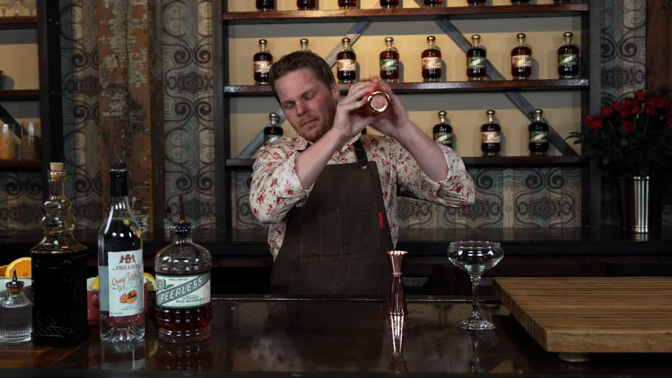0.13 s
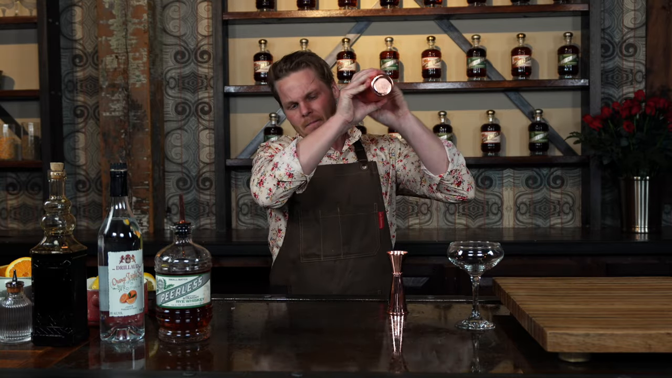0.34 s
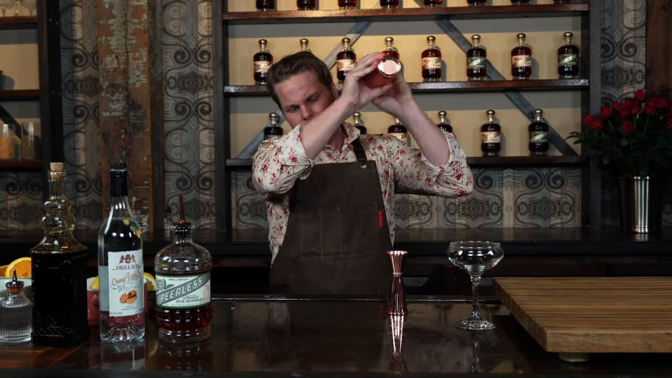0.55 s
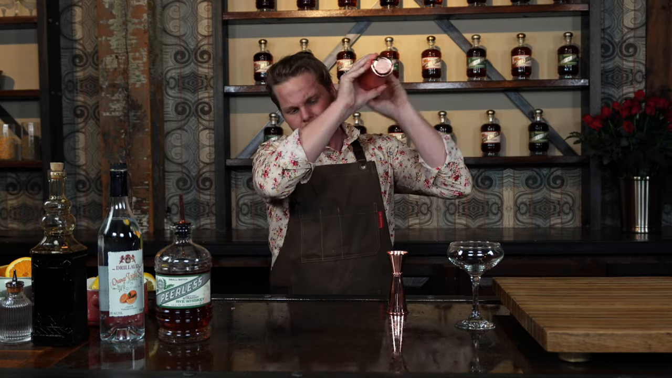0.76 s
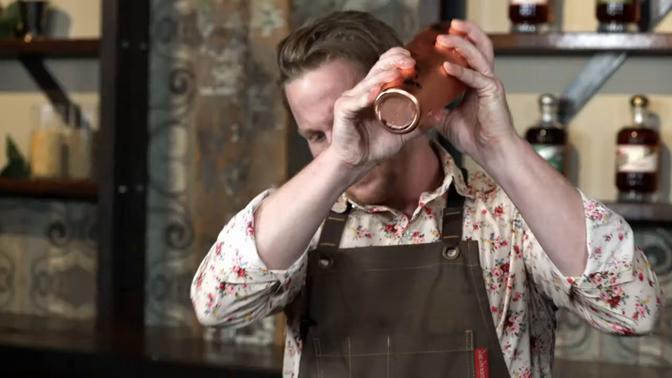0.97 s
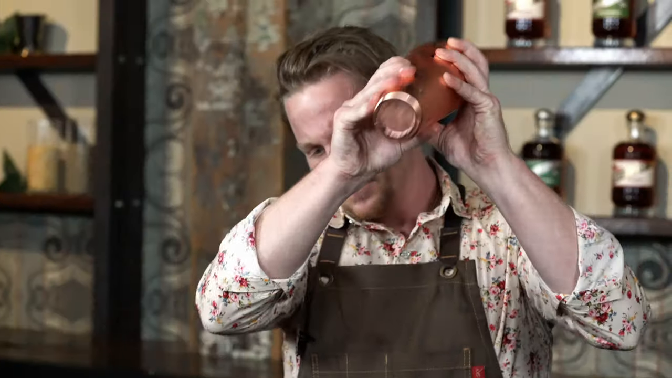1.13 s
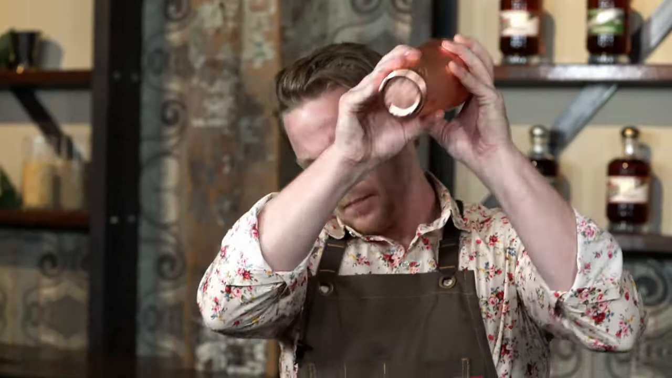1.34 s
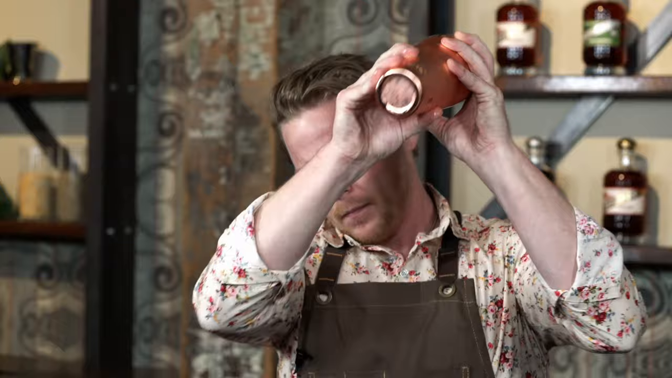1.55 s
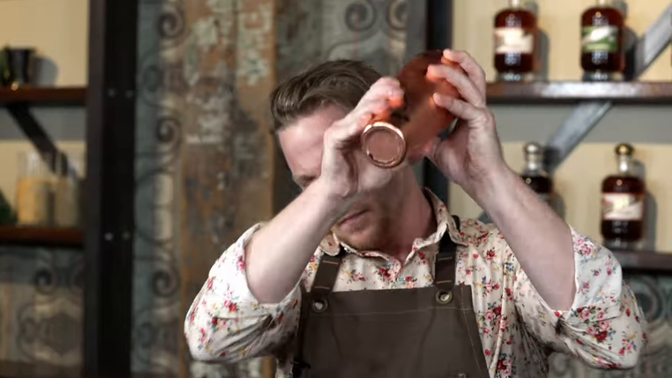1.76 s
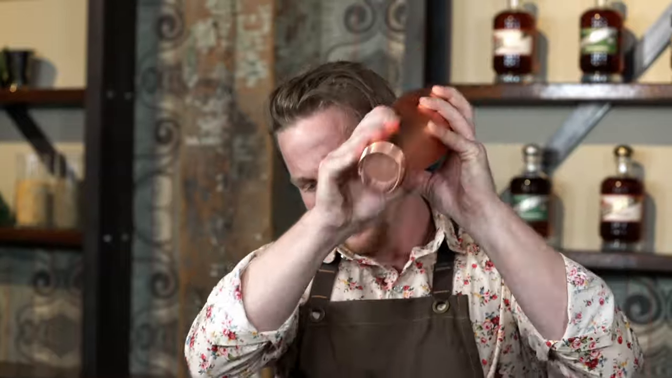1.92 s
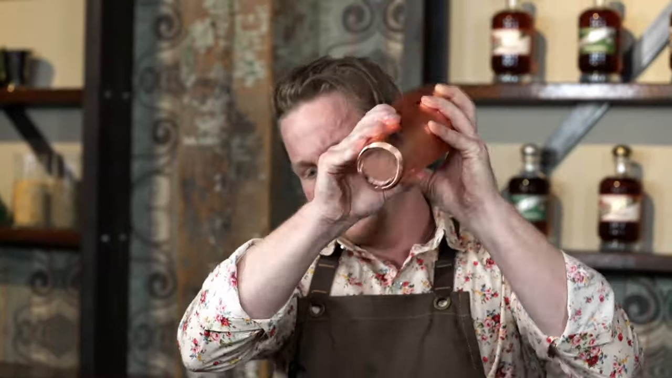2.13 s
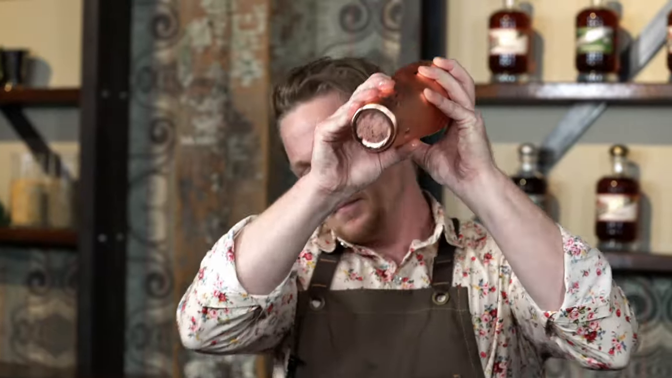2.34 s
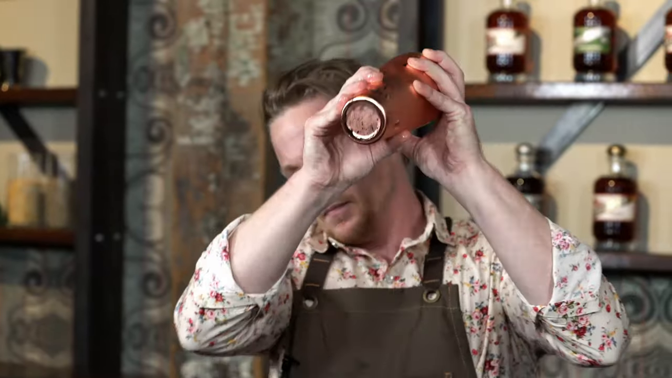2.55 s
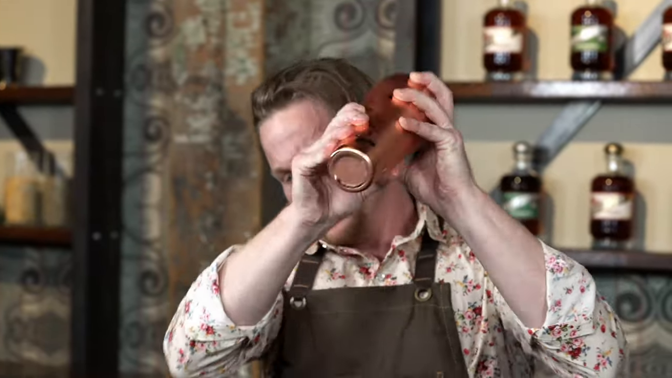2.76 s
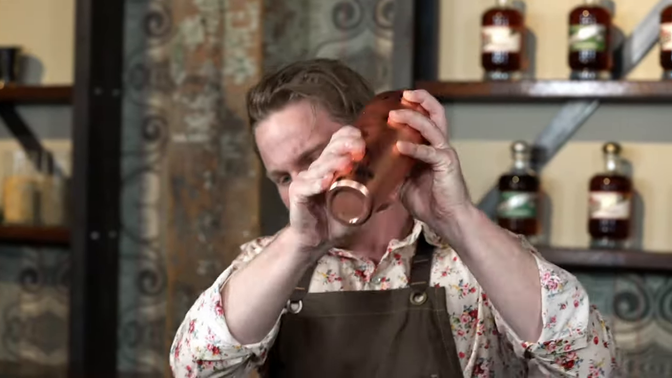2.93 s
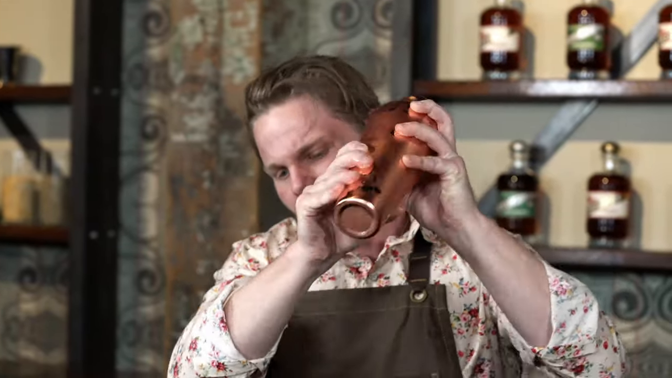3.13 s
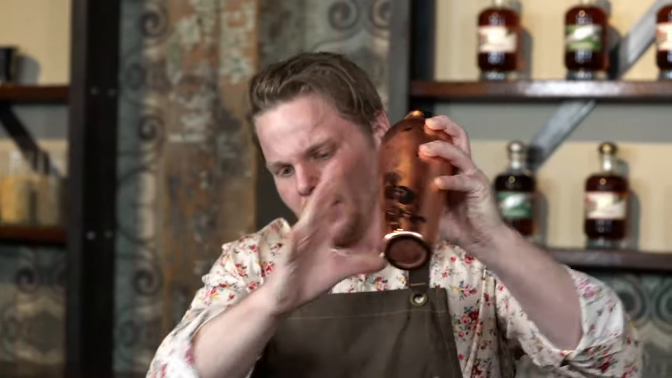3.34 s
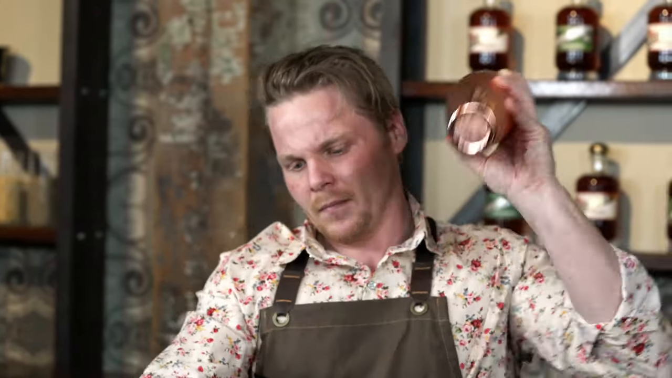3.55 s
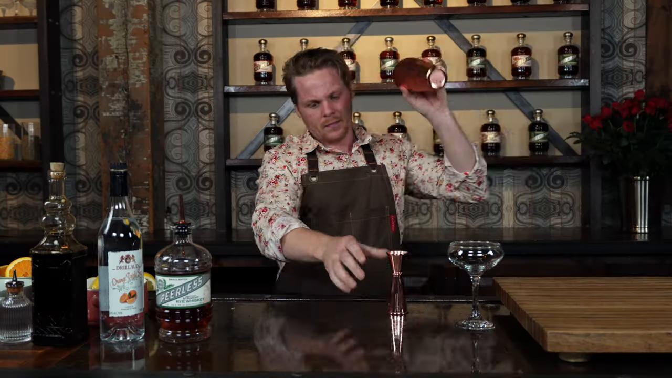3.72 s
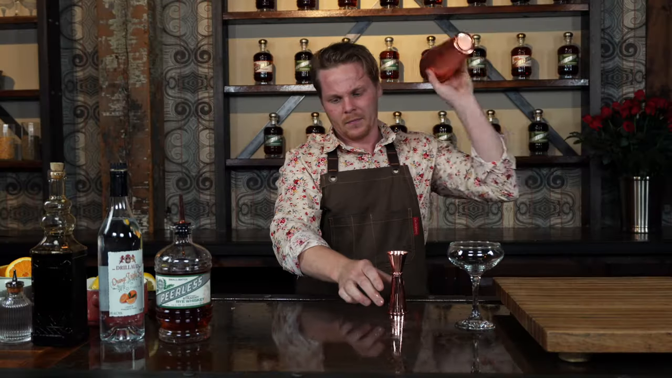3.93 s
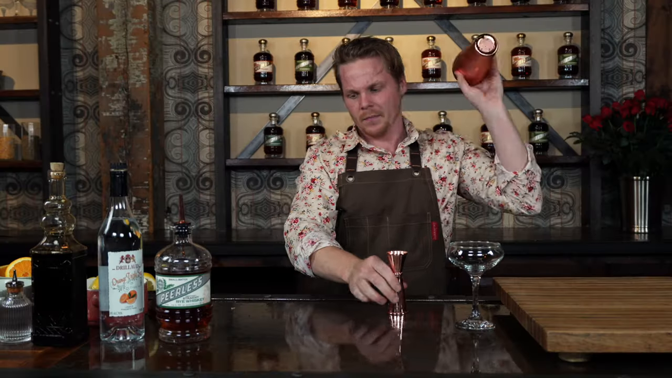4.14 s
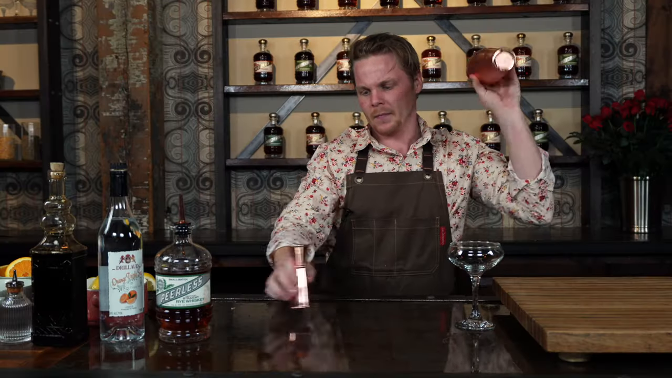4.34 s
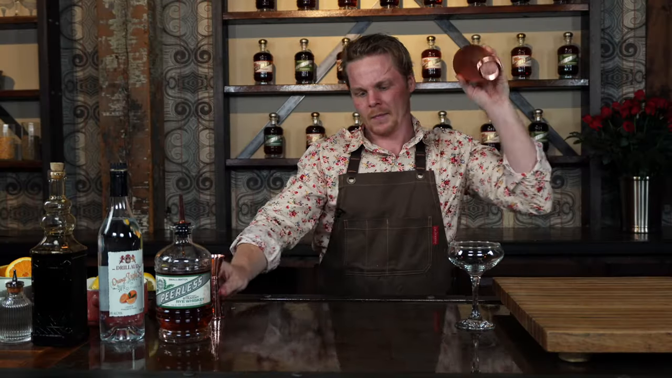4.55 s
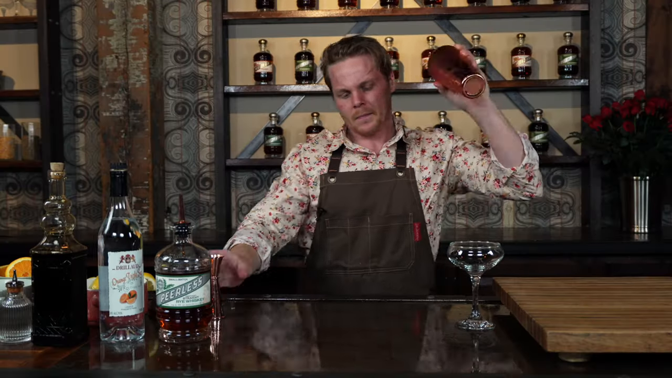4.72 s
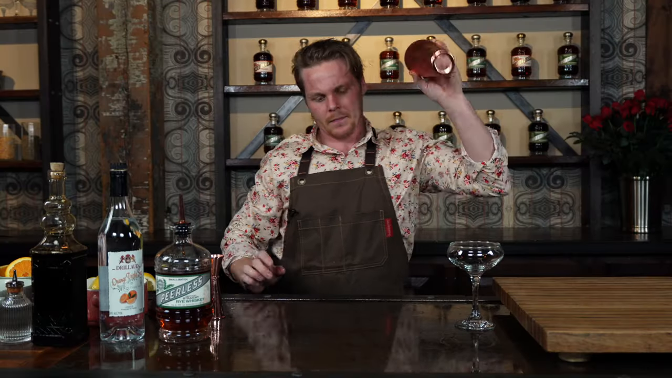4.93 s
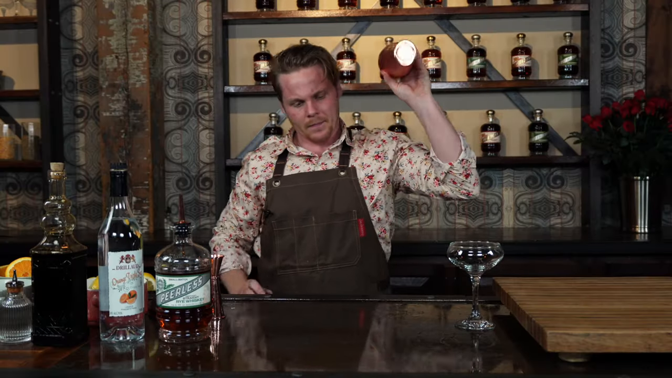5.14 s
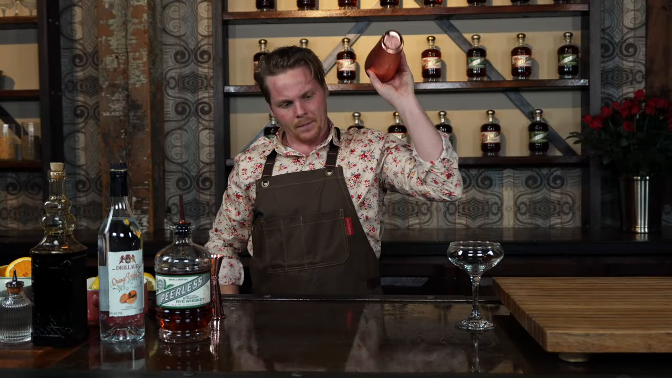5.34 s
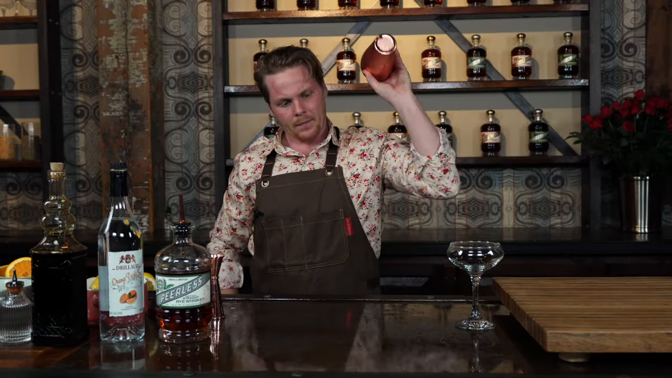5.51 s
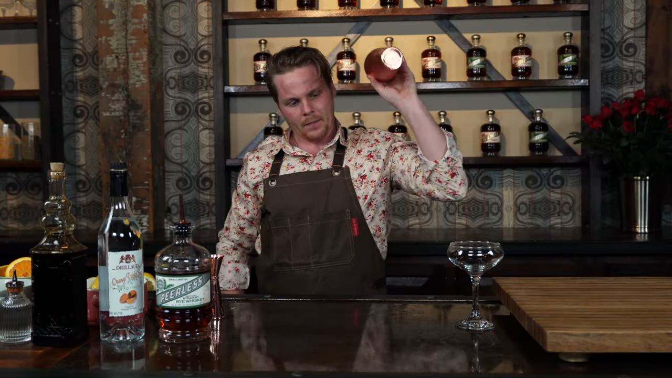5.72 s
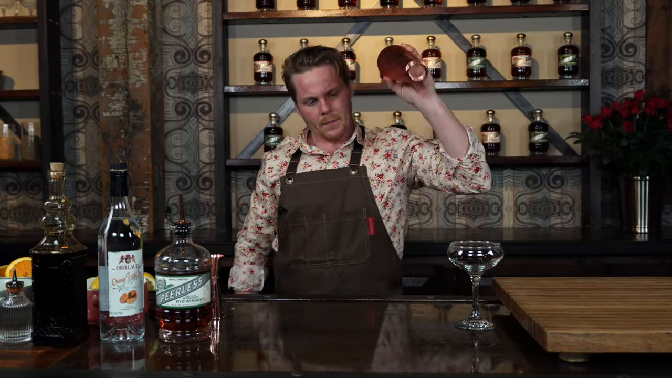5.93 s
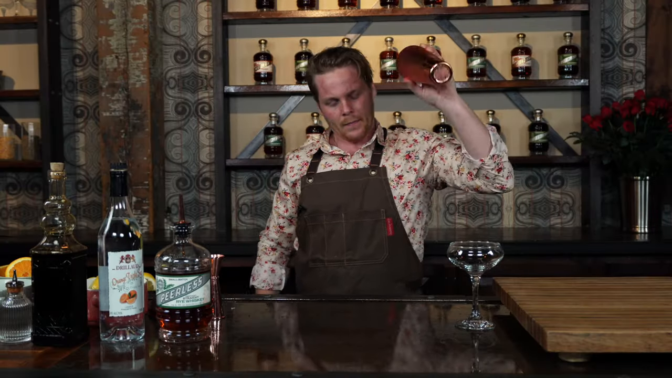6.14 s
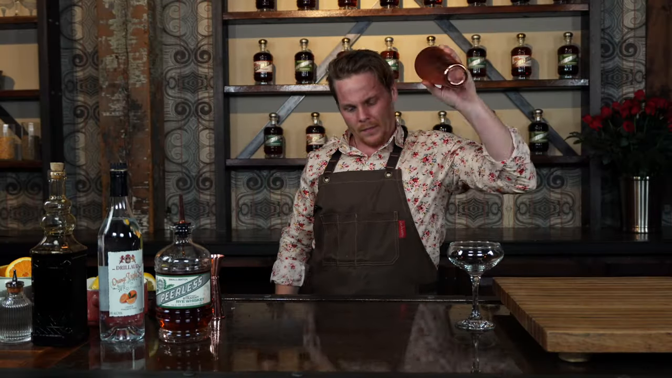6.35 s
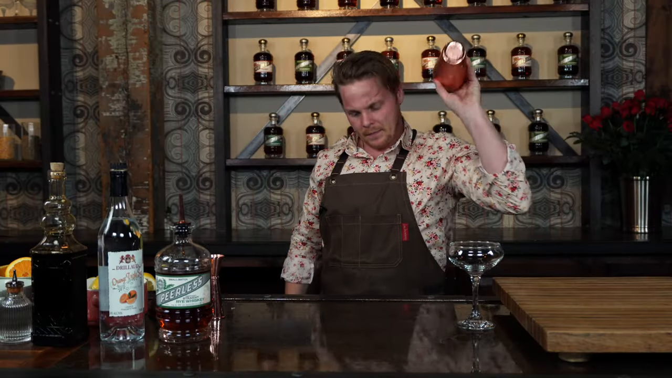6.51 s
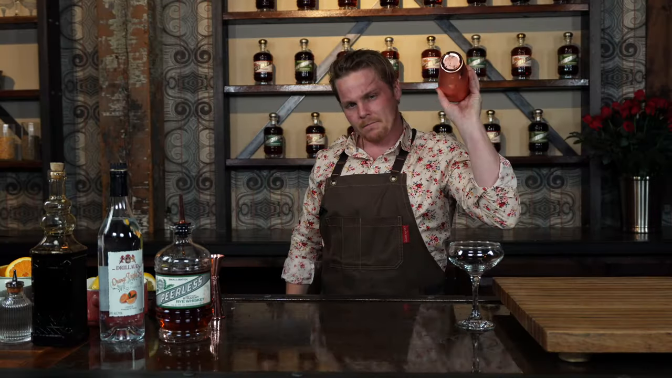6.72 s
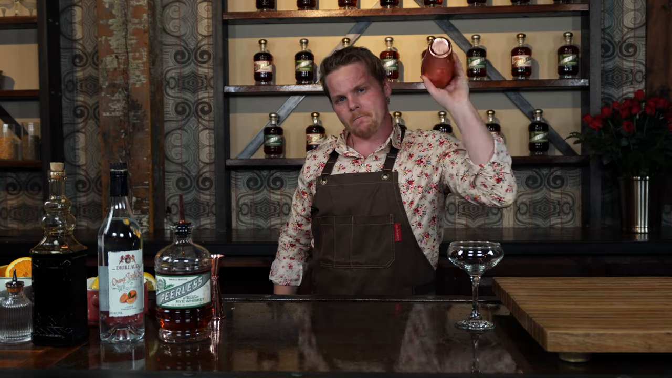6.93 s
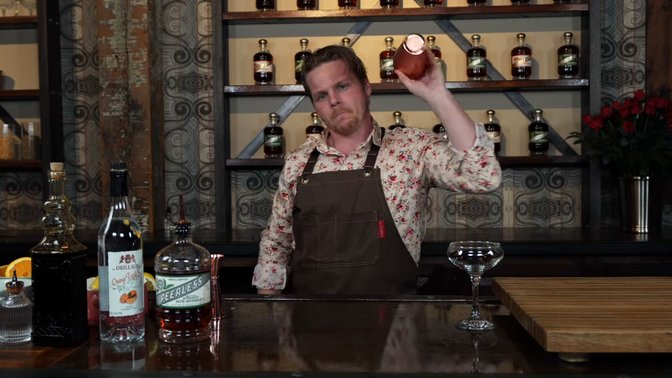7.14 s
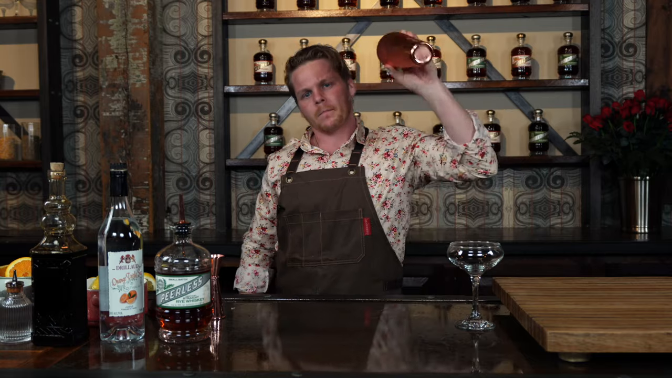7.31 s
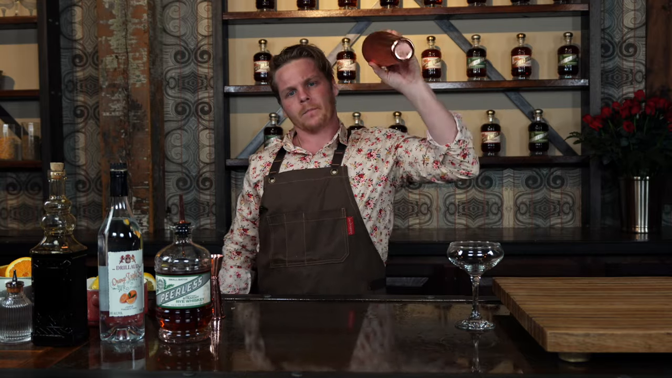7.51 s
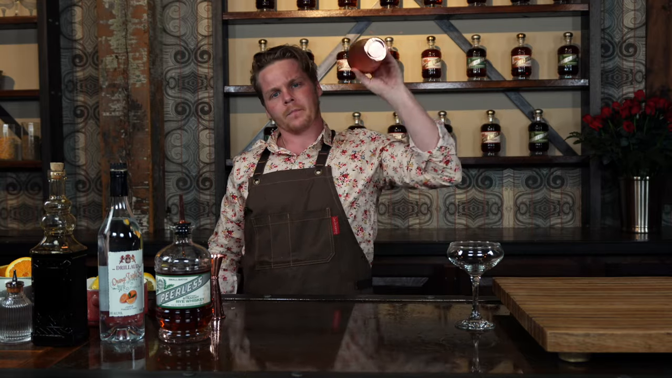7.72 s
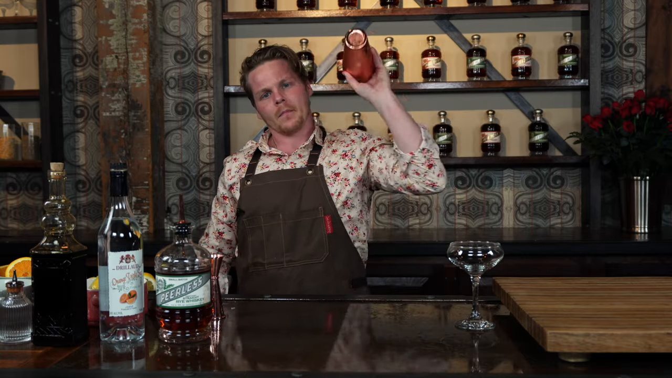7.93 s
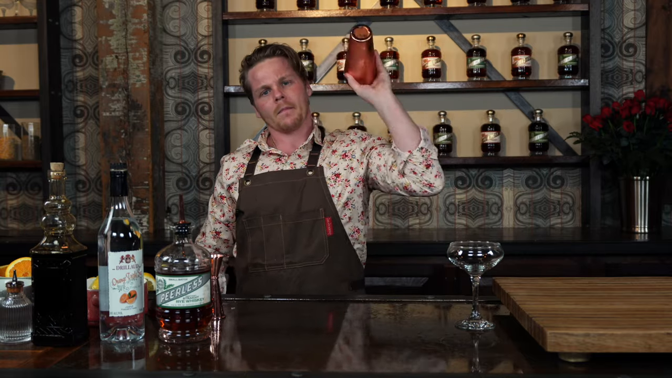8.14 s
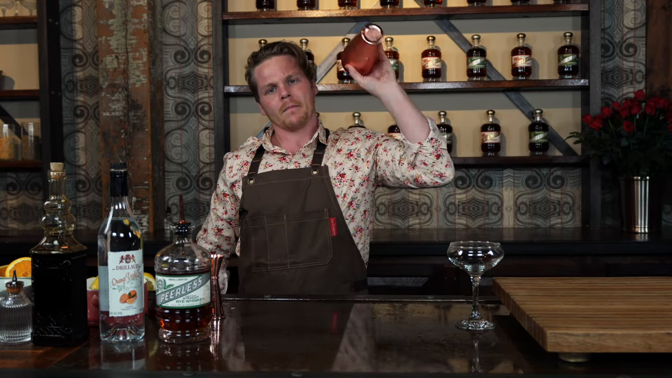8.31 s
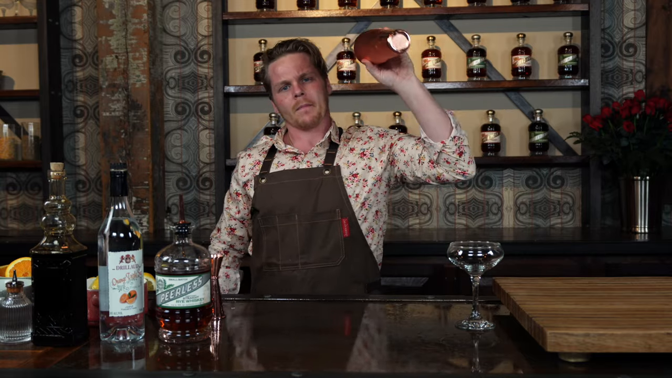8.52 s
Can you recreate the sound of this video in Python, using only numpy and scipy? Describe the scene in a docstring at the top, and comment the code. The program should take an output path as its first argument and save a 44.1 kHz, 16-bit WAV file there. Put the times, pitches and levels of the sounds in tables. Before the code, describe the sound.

Close up in a quiet bar, a metal cocktail shaker is shaken hard with both hands, the ice crashing from end to end with sharp clicks and some slosh. The rattle briefly dulls as the grip changes, then continues more lightly in one hand. Around the middle, a small metal jigger is put down on the wooden counter with a short knock. Faint room air lies underneath.

```python
"""At a bar, ice rattles in a metal shaker, first in two hands, then in one, about nine landings a second.
Each landing, at base and cap in turn, is a cloud of small knocks and slosh with a few hard cube hits
that ring the shell. The free hand drags a jigger aside and sets it down on the wooden counter.
Underneath lie steady room air and a low rumble that swells with the arm; a short room tail follows."""
import sys
import numpy as np
from scipy import signal
from scipy.io import wavfile
from scipy.ndimage import uniform_filter1d

SR = 44100
rng = np.random.default_rng(int(sys.argv[2]) if len(sys.argv) > 2 else 0)


def write(x):
    x = np.atleast_2d(x).T
    wavfile.write(sys.argv[1], SR, np.round(np.clip(x, -1, 1) * 32767).astype(np.int16))


N = 382347

# tone of the bar's air: (frequency [Hz], relative level [dB])
AIR_EQ = [(15, -62), (25, -42), (458, -11), (616, -25), (3850, 11), (6240, -26), (15600, -2)]
# fader ride of the arm rumble: (time [s], level [dB])
RUMBLE_RIDE = [(0, -68), (.25, -62), (.6, -76), (1.1, -70.5), (3.1, -69), (3.3, -55), (3.55, -73),
               (5.7, -78), (8.67, -77.5)]
# ice landing at base and cap in turn: (time [s], attack [s], crest level [dB])
LANDINGS = [(.04,.052,-19.5),(.127,.061,-20),(.239,.045,-21.5),(0.348,.057,-23.5),(.456,.042,-21),(.572,.044,-23.5),
            (.652,.055,-24),(.772,0.027,-23.5),(.862,0.042,-22.5),(0.966,.04,-25),(1.074,.049,-19),(1.161,.059,-25),
            (1.274,.044,-21),(1.371,.053,-23.5),(1.485,0.041,-20.5),(1.567,.076,-23.5),(1.677,.055,-22.5),(1.787,.021,-22.5),
            (1.88,.049,-20),(1.978,.027,-23),(2.077,.024,-18.5),(2.171,.061,-23),(2.274,.044,-22),(2.38,.039,-22.5),
            (2.457,.055,-21.5),(2.574,.026,-21),(2.676,.056,-22),(2.777,0.026,-22.5),(2.868,.027,-23),(2.972,.047,-20),
            (3.052,.056,-22),(3.16,.02,-18.5),(3.25,.11,-23),(3.479,0.027,-26),(3.622,.037,-26),(3.706,.1,-32),
            (3.859,.032,-27.5),(3.972,.025,-25.5),(4.106,.037,-26),(4.2,.063,-28),(4.325,.046,-27),(4.424,.062,-27.5),
            (4.576,0.013,-27.5),(4.693,.031,-26.5),(4.801,0.042,-28),(4.921,.042,-24.5),(5.028,.061,-29.5),(5.15,.024,-27.5),
            (5.276,.02,-28),(5.363,.062,-28),(5.507,.027,-26.5),(5.591,.045,-27.5),(5.721,.025,-26),(5.833,.041,-25.5),
            (5.96,.054,-27.5),(6.069,.031,-24.5),(6.199,.034,-27),(6.31,0.025,-24.5),(6.436,.013,-23.5),(6.546,.045,-25.5),
            (6.658,.047,-29),(6.787,.027,-25),(6.911,.026,-29),(7.024,.042,-27.5),(7.144,0.026,-30),(7.254,.037,-26),
            (7.382,.02,-30),(7.489,.038,-28.5),(7.608,.028,-29.5),(7.705,.063,-29.5),(7.803,.07,-30.5),(7.961,.036,-26),
            (8.078,.033,-31),(8.182,.046,-27.5),(8.287,.066,-31),(8.422,.019,-26.5),(8.549,.033,-27.5),(8.637,.017,-31)]
# rattle floor between landings: (time [s], level [dB])
LULLS = [(0, -30), (.5, -40), (.95, -33), (1.9, -33), (2.4, -35.5), (2.78, -38), (2.9, -32), (3.2, -30),
         (3.48, -34), (3.62, -41), (3.72, -37), (4.5, -38.5), (5.5, -36), (6.5, -39), (7.8, -38.5),
         (7.96, -32.5), (8.08, -40), (8.67, -38.5)]
# two hands, then one: (lull lift at base and cut at cap [dB], base dullness [dB], cap dullness [dB])
GRIPS = [(1.5, -1, 1.8), (-2.5, -3, 2)]
# tone of the small knocks and slosh: (frequency [Hz], relative level [dB])
RATTLE_EQ = [(24, -57), (40, -56), (213, -28), (485, -14), (655, -6.5), (800, -6.5), (1570, -3.5),
             (2460, -1), (3000, -4.5), (5070, -5), (5890, -8.5), (7020, -8), (9240, -15), (12800, -15),
             (15600, -19.5)]
# accents, the hardest single cubes: (time [s], ring level [dB], pitch [Hz], tick against ring [dB])
HARD_HITS = [(.0464,-6.5,1670,-28),(.0729,-4,2860,-20),(.1739,-8,2180,-1),(.1933,-12,3530,-14),(.248,-6,1990,1),
             (.2528,-11,1660,5.5),(.2573,-19,1460,6),(.268,-9,2050,-18),(.2703,-11,1480,-19),(.3129,-12,5070,-4),(.3605,-9.5,5000,2),(.4881,-6,1730,-18),
             (.5895,-11.5,2240,-2),(.6057,-18,1030,-18),(.7081,-11,1710,-16),(.7145,-9.5,3700,-18),(.7923,-14,2080,5),(.8097,-10.5,4400,-21),(.8905,-10,1400,-21),
             (.9803,-11,2430,1.5),(1.0018,-10,2350,-3),(1.0871,-6.5,1740,-14),(1.12,-7.5,2100,-13),(1.166,-8,5200,-4),
             (1.2944,-7,2330,-23),(1.3777,-13.5,5160,2),(1.3836,-11,2470,2.5),(1.4935,-5.5,1470,-19),(1.507,-10,2050,-13),
             (1.513,-12,6800,-13),(1.5257,-16,1380,-14),(1.5804,-9.5,2330,-13),(1.5886,-17,2200,0),(1.7448,-11,2110,-16),(1.8982,-8,1610,-22),(1.91,-9.5,1700,-22),(1.9182,-10,2450,-13),(1.9234,-13,1870,-11),
             (1.9754,-5,2370,0),(2.0982,-8,1370,-10),(2.1385,-7.5,1830,-22),(2.293,-5.5,1510,-10),(2.3829,-16.5,4520,1),(2.3996,-12,2200,3.5),
             (2.5019,-8,1530,-17),(2.512,-7.5,2350,-16),(2.6864,-11,2030,7),(2.7825,-11.5,2460,1),(2.9278,-7,2540,-8),
             (2.9448,-9,2240,-13),(3.0024,-13,5000,5),(3.0799,-3,1670,-24),(3.0994,-11,3760,-30),(3.1048,-4.5,2430,-18),(3.1727,-1,2340,-10),
             (3.1863,-3.5,2330,-16),(3.2018,-12,1940,-10),(3.2407,-13,2380,-30),(3.2557,-6,2300,-14),(3.2636,-0.5,1830,-5.5),(3.2937,-8.5,2120,-11),
             (3.311,-12,2440,-20),(3.3522,-13.5,5570,8.5),(3.3737,-13,2440,-11),(3.3903,-7,2270,-24),(3.532,-9,6000,-8),
             (3.7102,-17.5,1450,-2),(3.7232,-10.5,2040,-3),(3.7602,-11.5,7170,-10),(4.1136,-14.5,2040,-7),(4.2532,-13.5,4800,-1),
             (4.2685,-16.5,4960,1),(4.3873,-20,4000,-17),(4.4365,-17,4800,-17),(4.4585,-17,3550,-4),(4.5898,-24,2780,-21),(4.6238,-12.5,4900,-11),(4.7053,-14,5700,-1),(4.8537,-20.5,3330,8),(4.9296,-15.5,6460,2.5),(4.9334,-15.5,4150,-8),(4.9728,-12,2220,1),
             (5.047,-12,3450,-18),(5.099,-21,4520,-12),(5.1616,-14,1440,7),(5.3715,-11.5,6440,-5),(5.386,-20.5,1550,8),(5.4214,-15,1980,-3),
             (5.5227,-15.5,3780,-7),(5.6147,-11,6670,-11),(5.8375,-19,4230,-2),(5.8628,-17,1700,-10),(5.9876,-15,2670,-6),(6.073,-12.5,3700,-7),
             (6.0852,-13.5,1550,3.5),(6.2286,-15.5,2700,-16),(6.3155,-23,6000,7),(6.3237,-20,2930,3),(6.3468,-17,2980,-2),(6.6641,-9.5,2580,-3.5),(6.6943,-13,2740,-17),
             (6.7944,-15,1550,1),(6.81,-25,4560,6),(6.8176,-18,2430,-9),(6.831,-15,2300,-4),(6.9541,-16,3250,-2),(7.0487,-13.5,1620,1.5),(7.1508,-17.5,2550,-3),
             (7.188,-12.5,2760,-15),(7.264,-27,3750,10),(7.2827,-24,1460,15.5),(7.2892,-24,2430,9),(7.3006,-15,2640,-14),(7.409,-12.5,3290,-22),(7.4967,-20,7000,9),
             (7.5982,-23,3570,8),(7.6312,-13,2750,-18),(7.636,-13,2660,-19),(7.7435,-19,2980,-8),(7.8137,-15,2580,-13),(7.8313,-20,2660,-17),(7.987,-20,1870,6),(8.016,-16,2520,-20),
             (8.0835,-16,2780,-7),(8.0926,-13.5,2780,-20),(8.1077,-9.5,2840,-13),(8.2275,-15,3140,0),(8.2938,-12,2520,-22),
             (8.321,-13.5,2540,-21),(8.4508,-17,4470,6.5),(8.578,-14.5,2680,-17)]
# centre pitch of the softer hits, two hands, then one: (base [Hz], cap [Hz])
SOFT_HIT_PITCHES = [(1700, 2400), (2650, 1900)]
# modes of the metal shell: (frequency [Hz], relative level [dB], decay to -60 dB [s])
SHELL_MODES = [(1620, -29, 0.066), (2330, -25, 0.045), (2545, 13, 0.069), (2550, 9, 0.07),
               (2700, -17, .035), (3770, 10, 0.04), (5000, -8, 0.07), (7000, 19, 0.014)]
# reverb time of the bar: (frequency [Hz], decay to -60 dB [s])
ROOM_DECAY = [(300, 0.38), (1500, 0.25), (5000, 0.072), (14000, 0.14)]
# jigger touching the counter: (time [s], level before the low cut [dB], thud boost [dB])
JIGGER_TOUCHES = [(4.2465, -18, -22), (4.288, -27, -18), (4.472, -10.5, 5.5), (4.478, -22, -7),
                  (4.489, -17.5, -5)]
# modes of the counter under the jigger: (frequency [Hz], relative level [dB], decay to -60 dB [s])
COUNTER_MODES = [(258, 11, 0.058), (342, 8, 0.03), (420, -5, 0.13), (642, 4, 0.097), (745, 1, 0.077),
                 (771, 12.5, 0.088), (910, 16, 0.044), (1490, -15, .04)]

ONE_HAND_S = 3.42  # the second hand lets go
REGRIP_S, REGRIP_WIDTH_S, REGRIP_DULL_DB = 3.78, 0.37, 9  # the knocks darken while the grip changes


def gain_of(db):
    return 10 ** (np.asarray(db) / 20)


def unit_rms(x):
    return x / np.sqrt(np.mean(x ** 2) + 1e-20)


def unit_peak(x):
    return x / abs(x).max()


def curve_at(points, hz):
    """Read a curve along a log frequency axis."""
    frequency, value = np.transpose(points)
    return np.interp(np.log(hz + 1), np.log(frequency + 1), value)


def place(mix, start_s, sound):
    part = mix[max(round(start_s * SR), 0):][:len(sound)]
    part += sound[:len(part)]


def low_cut(x, hz):
    """Small bodies radiate little below hz."""
    return signal.sosfilt(signal.butter(3, hz, "high", fs=SR, output="sos"), x)


def equalise(x, points, size=4096):
    """Minimum-phase EQ through (frequency [Hz], gain [dB]) points."""
    log_gain = np.log(gain_of(curve_at(points, abs(np.fft.fftfreq(size, 1 / SR)))))
    spectrum = np.exp(np.conj(signal.hilbert(log_gain)))
    return signal.oaconvolve(x, np.fft.ifft(spectrum).real[:size // 2])[:N]


def ring(hz, t60, size=600):
    """A struck mode: a dying sine."""
    t = np.arange(size) / SR
    return gain_of(-60 * t / t60) * np.sin(2 * np.pi * hz * t)


def bar_air():
    """Room tone: a faint, steady bed of noise."""
    return gain_of(-67.5) * unit_rms(equalise(rng.standard_normal(N), AIR_EQ))


def arm_rumble():
    """Dark noise that swells with the arm movement."""
    band = signal.butter(2, [45, 190], "band", fs=SR, output="sos")
    dark = signal.sosfilt(band, rng.standard_normal(N))
    level_db = np.interp(np.arange(N) / SR, *np.transpose(RUMBLE_RIDE))
    return gain_of(level_db) * unit_rms(dark)


def shake_envelopes():
    """Level and dullness of the rattle: a jump as the ice lands, a crest, a fall into the next lull."""
    start, attack, crest_db = np.transpose(LANDINGS)
    at_base = np.arange(len(start)) % 2 == 0
    shift_db, base_db, cap_db = np.array(GRIPS)[(start > ONE_HAND_S).astype(int)].T
    lull_db = np.interp(start, *np.transpose(LULLS)) + np.where(at_base, shift_db, -shift_db)
    jump_db = np.maximum(crest_db - 4.5, lull_db)
    regrip = np.exp(-((start - REGRIP_S) / REGRIP_WIDTH_S) ** 2)
    dull_db = np.where(at_base, base_db, cap_db) + REGRIP_DULL_DB * regrip
    times = np.stack([start - .014, start, start + 0.013, start + attack], axis=1).ravel()
    levels = np.stack([lull_db, lull_db, jump_db, crest_db], axis=1).ravel()
    order = np.argsort(times)
    t = np.arange(N) / SR
    level_db = np.interp(t, np.r_[times[order], N / SR + .04], np.r_[levels[order], -38])
    return level_db, np.interp(t, start + attack, dull_db)


def punch(level_db):
    """How far the level stands above its quarter-second average, in dB."""
    return level_db - uniform_filter1d(level_db, SR // 4)


def knock_cloud(per_s, spread_db, lo_hz, hi_hz, cycles, pitches):
    """Random knocks, mostly small, each dying away over the given number of cycles."""
    strikes = gain_of(spread_db * np.minimum(rng.exponential(1, N), 2.8)) * rng.choice([-1, 1], N)
    strikes *= rng.random(N) < per_s / SR
    voice = rng.integers(0, pitches, N)
    knocks = (signal.oaconvolve(strikes * (voice == k), ring(hz, cycles / hz) * hz)[:N]
              for k, hz in enumerate(np.geomspace(lo_hz, hi_hz, pitches)))
    return unit_rms(sum(knocks))


def tumble(per_s):
    """Cubes tumble in bunches: a level flutter of sudden starts and quick fades, with unit spread."""
    starts = rng.exponential(1, N) * (rng.random(N) < per_s / SR)
    fading = signal.lfilter([1], [1, -np.exp(-1 / (0.0025 * SR))], starts)
    bunches = np.log(0.42 + fading)
    return unit_rms(bunches - bunches.mean())


def ice_rattle():
    """Dull knocks, bright ticks and the slosh of the drink, all riding the force of the stroke."""
    level_db, dull_db = shake_envelopes()
    punch_db = punch(level_db)
    dull = knock_cloud(per_s=900, spread_db=3.0, lo_hz=535, hi_hz=1953, cycles=13, pitches=16)
    bright = knock_cloud(per_s=1600, spread_db=3.5, lo_hz=2050, hi_hz=6450, cycles=10.5, pitches=10)
    crisp = knock_cloud(per_s=1200, spread_db=3.5, lo_hz=6300, hi_hz=14600, cycles=7.9, pitches=8)
    slosh = rng.standard_normal(N)
    mix = gain_of(-6.5 + 0.62 * dull_db) * dull + gain_of(0.5 - 0.4 * dull_db) * bright
    mix += gain_of(-1.5 + 0.15 * punch_db) * crisp  # harder landings are crisper
    mix += gain_of(-12.5 + 0.19 * punch_db) * slosh
    # flatten the overall spectrum, then dial in the rattle's tone
    hz, power = signal.welch(mix, SR, nperseg=256)
    flat = equalise(mix, np.transpose([hz[1:], -10 * np.log10(power[1:])]))
    body = equalise(flat, RATTLE_EQ)
    flutter = gain_of(1.85 * tumble(per_s=150))
    return low_cut(gain_of(level_db) * unit_rms(flutter * body), 163)


def soft_hits(count=80, spread_octaves=.16):
    """Chance fill between the accents, in rows like HARD_HITS; most fall near a landing's crest."""
    level_db, _ = shake_envelopes()
    odds = np.cumsum(gain_of(2 * punch(level_db)))
    when, strength, tick = rng.random((count, 3)).T
    sample = np.searchsorted(odds / odds[-1], (np.arange(count) + when) / count).clip(0, N - 1)
    start = sample / SR
    landing = np.maximum(np.searchsorted(np.transpose(LANDINGS)[0], start) - 1, 0)
    centre_hz = np.array(SOFT_HIT_PITCHES)[(start > ONE_HAND_S).astype(int), landing % 2]
    hz = centre_hz * 2 ** (spread_octaves * rng.standard_normal(count))
    ring_db = level_db[sample] + 7.5 + 5.5 * (strength - .5)
    tick_db = -11 + 13 * tick
    return np.transpose([start, ring_db, hz, tick_db])


def cube_hits():
    """Single cubes strike: two close rings, a weaker stray ring, and a bright crack with an overtone."""
    hits = np.r_[HARD_HITS, soft_hits()]
    out, draws = np.zeros(N), rng.random((len(hits), 4))
    t = np.arange(600) / SR
    cracks = low_cut(rng.standard_normal((len(hits), 600)), 3000) * gain_of(-60 * t / 0.0047)
    cracks = signal.lfilter([1], [1, -.35], cracks)  # ice dulls the very top
    snap = ring(4800, t60=0.0015)  # the dry first touch
    contact = 1 - np.exp(-t / 0.000067)  # ice gives a little, so the rings swell in
    for (start, db, hz, tick_db), (side, detune, low, high), crack in zip(hits, draws, cracks):
        t60 = .006 + 12 / hz  # low, hollow knocks last a little longer
        pair = ring(hz, t60) + .5 * ring(hz * (0.836 + 0.41 * detune), t60)
        stray = ring(1100 * 3.24 ** low, t60=0.0082)
        overtone = ring(3200 * 2.335 ** high, t60=0.011)
        body = unit_peak(contact * (pair + 0.58 * stray))
        tick = unit_peak(crack) + 0.34 * snap + 0.48 * overtone
        place(out, start, np.sign(side - .5) * gain_of(db) * (body + gain_of(tick_db) * tick))
    return low_cut(out, 760)


def shell_ring(knocks):
    """The hand-damped metal rings on after each knock."""
    modes = sum(gain_of(db) * ring(hz, t60, size=4000) for hz, db, t60 in SHELL_MODES)
    return low_cut(signal.oaconvolve(knocks, modes / np.linalg.norm(modes))[:N], 1700)


def room_tail(direct):
    """Noise tails, each band dying at its own speed; the moving shaker feeds three of them in turn."""
    out, predelay = np.zeros(N), np.zeros(round(.002 * SR))
    turn = 2 * np.pi * 1.3 * np.arange(N) / SR
    for k in range(3):
        hz, t, bands = signal.stft(rng.standard_normal(SR // 2), SR, nperseg=256)
        decay = gain_of(-60 * t / curve_at(ROOM_DECAY, hz)[:, None])
        _, tail = signal.istft(bands * decay, SR, nperseg=256)
        send = np.sqrt(2 / 3) * np.cos(turn + k * np.pi / 3)
        out += signal.fftconvolve(direct * send, np.r_[predelay, tail / np.linalg.norm(tail)])[:N]
    return out


def jigger():
    """A small metal foot knocks on the wooden counter; the modes under 500 Hz carry the thud."""
    out = np.zeros(N)
    for start, db, thud_db in JIGGER_TOUCHES:
        knock = sum(gain_of(mode_db + thud_db * (hz < 500)) * ring(hz, t60, size=6000)
                    for hz, mode_db, t60 in COUNTER_MODES)
        place(out, start, gain_of(db) * unit_peak(knock))
    for _ in range(3):  # stacked for a steep slope
        out = low_cut(out, 274)
    return out


def scene():
    """Mono mix: shaker and jigger up front, a little room, air and rumble underneath."""
    rattle, hits = ice_rattle(), cube_hits()
    shell = gain_of(-31.5) * shell_ring(rattle) + gain_of(-26) * shell_ring(hits)
    direct = rattle + hits + shell + jigger()
    return (direct + gain_of(-12.5) * room_tail(direct) + bar_air() + arm_rumble())[None]


def record(dry):
    """Master chain: a soft clip rounds the loudest peaks, then a steep high cut trims the very top."""
    rounded = 1.05 * np.tanh(dry / 1.05)
    high_cut = signal.firwin(255, 15850, window=("kaiser", 10), fs=SR)
    return signal.oaconvolve(rounded, high_cut[None], "same")


dry = scene()
out = record(dry)
write(out)
```